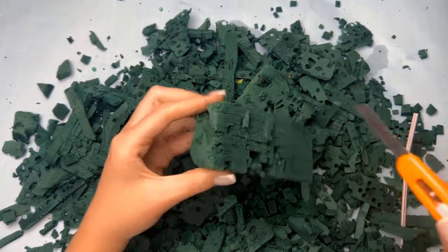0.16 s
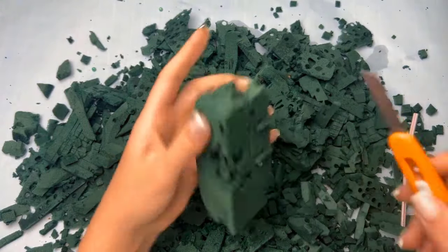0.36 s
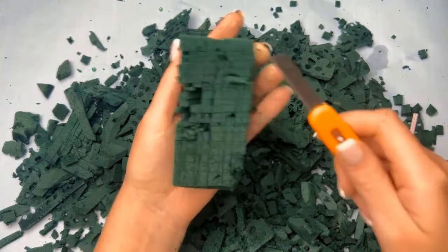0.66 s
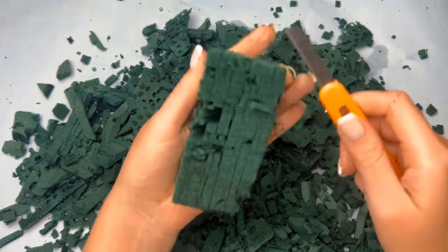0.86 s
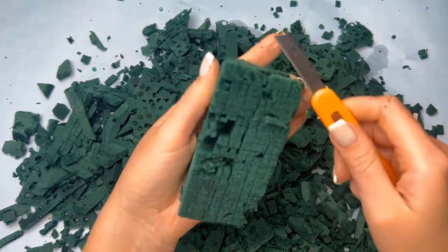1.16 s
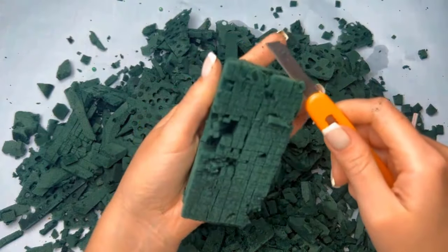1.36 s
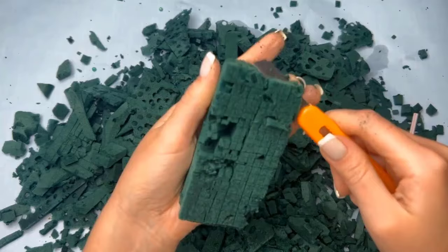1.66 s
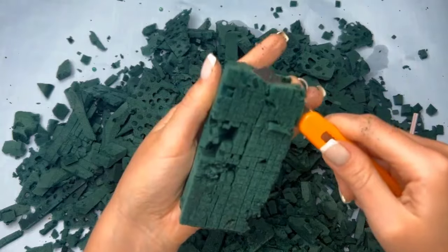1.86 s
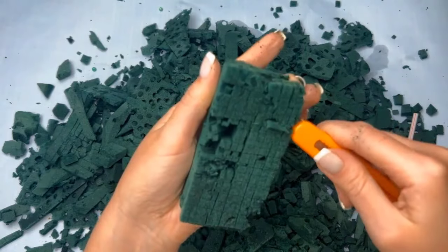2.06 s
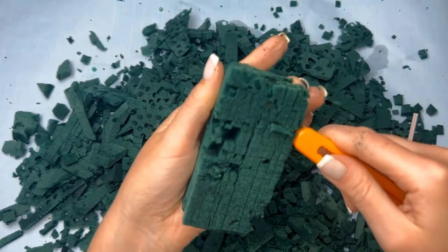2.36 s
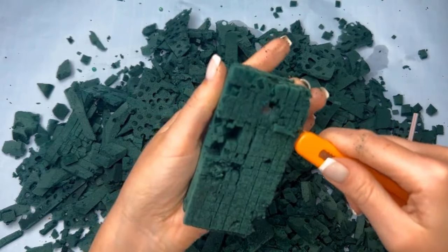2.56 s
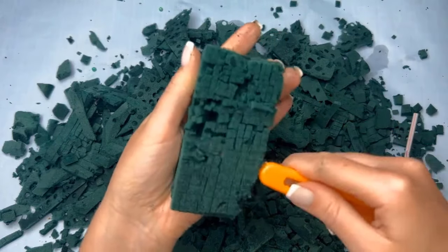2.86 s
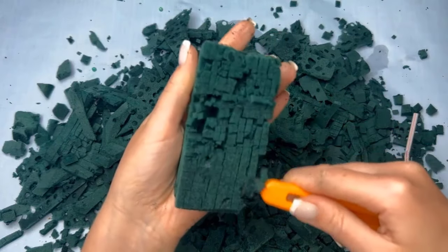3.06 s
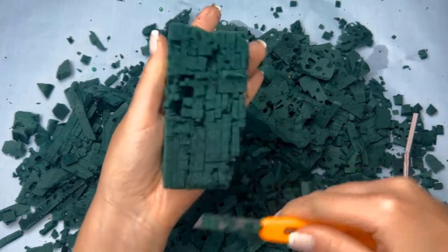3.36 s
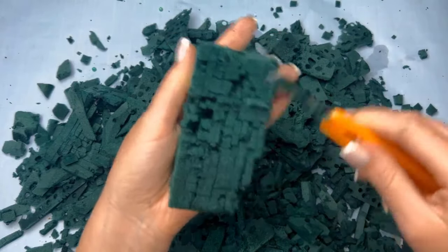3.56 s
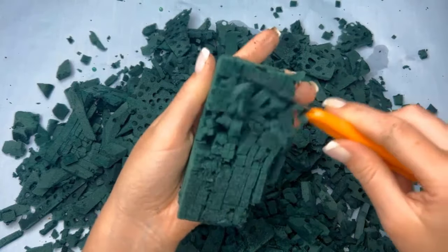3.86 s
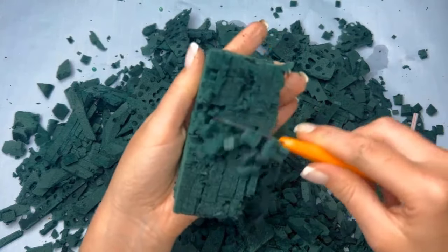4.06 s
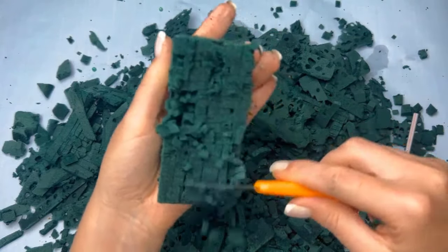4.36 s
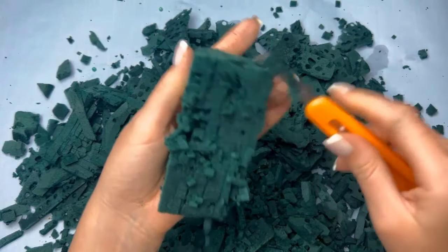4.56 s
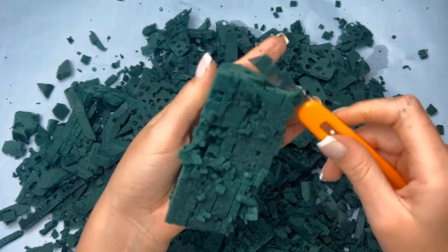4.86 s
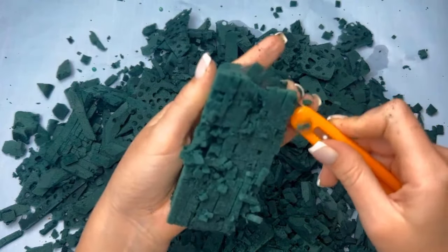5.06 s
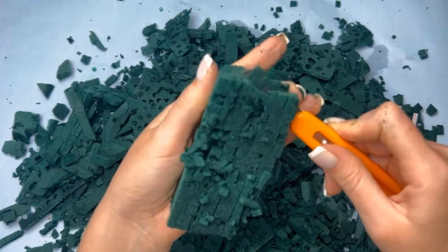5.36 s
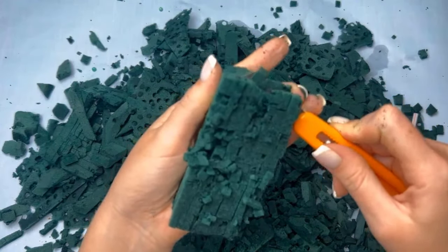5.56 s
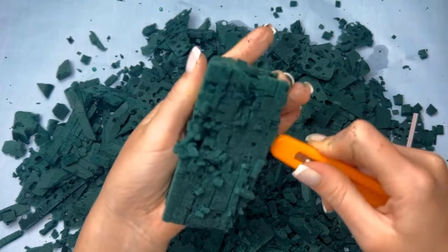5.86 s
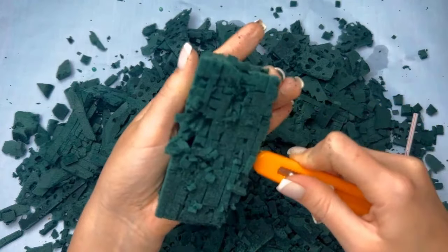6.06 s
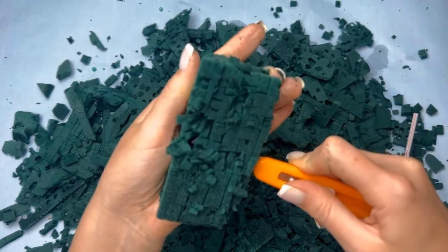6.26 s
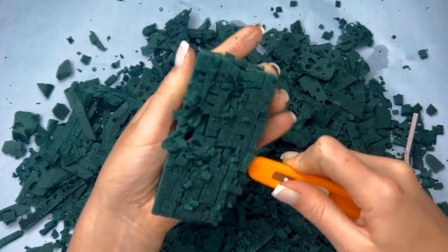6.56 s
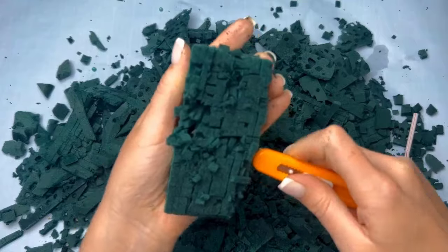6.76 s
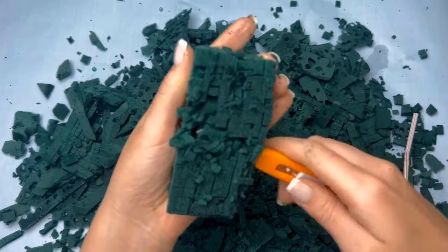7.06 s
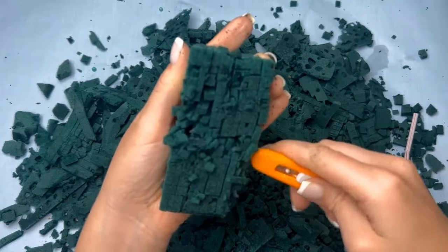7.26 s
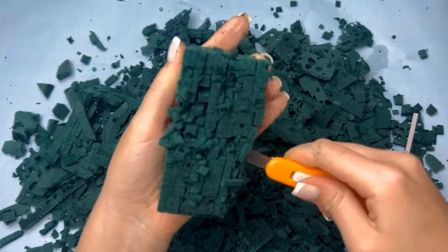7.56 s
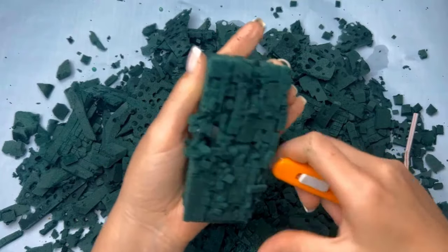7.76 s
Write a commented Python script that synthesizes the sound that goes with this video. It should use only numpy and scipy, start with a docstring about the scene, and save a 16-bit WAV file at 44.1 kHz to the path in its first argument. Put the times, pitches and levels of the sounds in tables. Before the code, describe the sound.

A craft knife scrapes through dry, crumbly foam in crunchy strokes, with small ticks, soft bumps and one loud final rasp over a fan hum.

```python
"""Craft knife through dry foam

A blade scrapes through a crumbly foam block close to two microphones. Tiny cells crush under the edge
in slow strokes, the thin steel ticks as it catches, hands bump the block. Near the end the blade tears
through in one loud, overloading rasp and squeaks out. A fan hums in the room."""
import sys
import numpy as np
from scipy import signal
from scipy.fft import rfft, irfft, next_fast_len
from scipy.io import wavfile

SR = 44100
rng = np.random.default_rng(int(sys.argv[2]) if len(sys.argv) > 2 else 0)


def to_wav(s):
    """Save 16-bit WAV."""
    ch = np.atleast_2d(s).T  # columns
    pcm = np.round(np.clip(ch, -1, 1) * 32767)  # PCM
    wavfile.write(sys.argv[1], SR, pcm.astype(np.int16))


N = 349699
TIME_S = np.arange(N) / SR
FFT_SIZE = next_fast_len(N + 4096)
FREQ_HZ = np.maximum(np.arange(FFT_SIZE // 2 + 1) * SR / FFT_SIZE, 1)

# stereo image of blade and foam: (frequency [Hz], coherence [0-1], left phase lead [rad])
NEAR_IMAGE = [(200, .95, 0), (700, .45, -.7), (1700, .65, 0), (2700, .5, 2.5), (4000, .4, 1),
              (5200, .5, 1.7), (5600, .996, 3.1), (6400, .996, 3.2), (6950, .5, 4.8), (7600, .88, 6.1),
              (8900, .8, 6.5), (9800, .99, 9.35), (10900, .99, 9.5), (11600, .6, 12)]
# stereo image of fan air and knocks: (frequency [Hz], coherence [0-1], left phase lead [rad])
FAR_IMAGE = [(60, 0.97, 0.007), (133, 1, 0.02), (246, 0.92, 0.0092), (660, 0.014, 0), (1600, 0.79, 0.042),
             (3140, 0.91, 0.008), (7000, 0.06, 0.007)]
# fan air: (frequency [Hz], relative density [dB])
AIR_SPECTRUM = [(20, -23), (48, -5.5), (75, -5), (120, -5), (220, 0), (330, -6), (430, -10.5), (520, -8),
                (750, -12.5), (1300, -18), (1800, -25), (2700, -42.5), (5000, -95)]
# fan hum: (frequency [Hz], relative level [dB])
FAN_TONES = [(156.1, -58.5), (199.2, -39.5), (333.8, -40.5)]
# handling bumps: (time [s], level [dB], pitch [Hz], half rise time [s])
HAND_THUDS = [(0.771, -10.5, 65.6, 0.0083), (0.804, -23, 60, 0.009), (0.958, -18, 85.5, 0.0054),
              (1.91, -26, 48, 0.02), (2.458, -26, 47.4, 0.031), (7.39, -22.5, 64, 0.027)]
# knife and fingers hit the block: (time [s], level [dB], resonance [Hz], grit t60 [s])
BLOCK_KNOCKS = [(0.401, -21.5, 498, 0.057), (0.9311, -14, 469, 0.19), (.942, -36, 2000, 0.9),
                (0.959, -17.5, 306, 0.4), (.963, -27, 2140, 0.063), (2.528, -12.5, 1470, 0.12),
                (2.533, -20.5, 397, 0.26), (7.405, -23, 1500, 0.18), (7.681, -13.5, 1820, 0.023)]
# struck blade: (frequency [Hz], level [dB], t60 [s])
BLADE_MODES = [(1750, -16, .008), (2230, -2, .015), (2790, -10, .008), (3340, -12, .012), (4600, -11, .005),
               (5550, -1, .006), (7000, -2, .006), (8950, -3, .006), (11000, -2, .006)]
# blade catches, springs free; rows at 0.403 s and 2.53 s are the bright crack of block knocks: (time [s],
# strength [dB], brightest pitch [Hz], spread [octaves])
BLADE_CATCHES = [(.403, -10.5, 3240, 0.38), (2.53, -13, 2810, .8), (3.279, -6, 3350, .3),
                 (3.2873, -7, 3800, 0.43), (3.294, 7, 8600, 1), (3.3023, -1.5, 9800, 0.88),
                 (5.458, 6.5, 4740, 1.7), (6.671, -7.5, 3300, 0.3), (6.856, -7, 3300, 0.24),
                 (7.361, -12, 3770, 0.3), (7.6828, 5, 5140, 0.51), (7.7091, 8.5, 3500, 0.36),
                 (7.854, -12, 3400, 0.24)]
# rubbed blade: (frequency [Hz], width [Hz], relative level [dB])
RUBBED_MODES = [(2060, 2700, -12.5), (3380, 810, -21.5), (4850, 380, -16), (6030, 1100, -64),
                (7175, 67, -19.5), (8000, 1600, -10.5)]
# slowly crushed foam: (frequency [Hz], relative density [dB])
CRUSH_SPECTRUM = [(150, -22), (400, -9), (900, -9.5), (1500, -8), (2700, -8), (4000, -7.5), (5300, -4),
                  (7250, -1.5), (8900, -4), (10500, -1), (11600, -5.5)]
# fingers and blade flat rub the block: (time [s], level [dB])
RUB_CURVE = [(0, -52), (.2, -42.5), (.78, -46), (.88, -52), (1.35, -52.5), (2.95, -41.5), (3.6, -56.5),
             (3.85, -58), (4.25, -49), (4.45, -51), (5.12, -56.5), (5.25, -47), (5.4, -48.5), (6.95, -46.5),
             (7.05, -48), (7.93, -40)]
# edge strokes: (start [s], length [s], level [dB], dull band gain [dB])
EDGE_STROKES = [(0.313, 0.12, -36.5, 6), (0.913, 0.05, -44.5, 17.5), (1.38, 0.29, -36, 1.5),
                (1.55, 0.078, -36.5, 0.5), (1.677, 0.06, -29.5, 0.5), (1.763, 0.13, -33, -1.5),
                (1.955, 0.037, -29.5, -4), (1.984, 0.027, -24, 3.5), (2.07, 0.12, -35, 0.5),
                (2.226, 0.11, -28.5, -1.5), (2.352, 0.12, -32.5, 0), (2.485, 0.11, -30.5, 7),
                (2.589, 0.16, -23, -1), (2.716, 0.1, -18.5, 2), (2.968, 0.11, -24, 2),
                (3.076, 0.13, -21, 1), (3.226, 0.056, -24, 5), (3.97, 0.076, -35.5, 1),
                (4.22, 0.13, -45, -9), (4.863, 0.054, -48.5, 3), (5.012, 0.036, -41, 0.5),
                (5.458, 0.081, -34.5, 10), (5.546, 0.11, -38.5, 8), (5.649, 0.1, -18, 2),
                (5.875, 0.081, -24, -3), (5.935, 0.078, -19, 1), (6.023, 0.18, -29.5, 0),
                (6.215, 0.15, -30.5, 3), (6.297, 0.21, -32.5, 3.5), (6.573, 0.15, -31.5, 2),
                (6.736, 0.18, -36, 2), (7.167, 0.042, -39.5, 9.5)]
# torn foam: (frequency [Hz], relative density [dB])
TEAR_SPECTRUM = [(25, -14), (60, -5), (200, -10), (600, -14), (1050, -26), (1600, -13), (3300, -5),
                 (4000, -6), (6000, 0), (8000, -1), (10500, -2), (11800, -5)]
# chunks give way in the rip: (time [s], surge [dB], length [s])
CHUNK_SURGES = [(7.368, 19, 0.0057), (7.385, 25, 0.0074), (7.396, 15.5, 0.028), (7.418, 36, 0.012),
                (7.433, 8.5, 0.015), (7.474, 10, 0.015), (7.514, 13.5, 0.0084)]
# bent blade: (frequency [Hz], peak gain [dB])
BENT_MODES = [(3470, -2.5), (4170, 0), (5090, 0), (6050, 4.5), (7240, -7), (7950, -11), (9780, -8)]
# steel leaves the block: (time [s], level [dB])
SQUEAK_CURVE = [(7.68, -86), (7.77, -32), (7.848, -44), (7.855, -30), (7.9, -36), (7.915, -67)]

SWELL_SHARE = 0.6   # attack / stroke length
RIP_START_S, RIP_HOLD_S = 7.368, 0.17


def from_db(db):
    """Decibels to gain."""
    return 10 ** (np.asarray(db) / 20)


def unit_rms(x):
    """Scale to rms 1."""
    return x / np.sqrt(np.mean(x ** 2) + 1e-20)


def gain_curve(rows):
    """Level breakpoints to gain per sample."""
    times_s, levels_db = np.transpose(rows)
    return from_db(np.interp(TIME_S, times_s, levels_db))


def per_bin(rows):
    """Table columns interpolated over log frequency."""
    hz, *columns = np.transpose(rows)
    return [np.interp(np.log(FREQ_HZ), np.log(hz), column) for column in columns]


def drift(rate_hz):
    """Smooth random curve, rms 1."""
    spectrum = rfft(rng.standard_normal(FFT_SIZE)) / (1 + (FREQ_HZ / rate_hz) ** 2)
    return unit_rms(irfft(spectrum, FFT_SIZE)[:N])


def butter(x, order, edges_hz, kind="low"):
    """Causal Butterworth filter."""
    return signal.sosfilt(signal.butter(order, edges_hz, kind, fs=SR, output="sos"), x)


def resonance(x, hz, width_hz):
    """Two-pole resonator, peak gain 1."""
    radius = np.exp(-np.pi * width_hz / SR)
    feedback = [1, -2 * radius * np.cos(2 * np.pi * hz / SR), radius ** 2]
    return signal.lfilter(np.array([1, 0, -1]) * (1 - radius ** 2) / 2, feedback, x)


def envelope(start_s, attack_s, length_s, fall_db_per_s):
    """Rise, hold, decay; one gain per millisecond."""
    age_s = np.arange(0, N / SR + .001, .001) - start_s
    return np.clip(age_s / attack_s, 0, 1) * from_db(-fall_db_per_s * np.maximum(age_s - length_s, 0))


def per_sample(per_ms):
    """Millisecond grid to sample grid."""
    return np.interp(TIME_S, np.arange(len(per_ms)) / 1000, per_ms)


def microphones(pair, image, spectrum=None):
    """Two independent signals to partly coherent, phase-shifted stereo."""
    coherence, lead_rad = per_bin(image)
    colour = 1 if spectrum is None else from_db(per_bin(spectrum)[0])
    left, other = rfft(pair, FFT_SIZE) * colour
    right = coherence * left * np.exp(-1j * lead_rad) + np.sqrt(1 - coherence ** 2) * other
    return irfft(np.array([left, right]), FFT_SIZE)[:, :N]


def fan():
    """Dull rushing air and wavering tones, slightly left."""
    air = unit_rms(microphones(rng.standard_normal((2, N)), FAR_IMAGE, AIR_SPECTRUM))
    hum = np.zeros(N)
    for hz, db in FAN_TONES:
        gain = from_db(db + 3.0 * drift(rate_hz=6))
        hum += gain * np.sin(2 * np.pi * hz * TIME_S + 0.88 * drift(rate_hz=4.5))
    return (from_db(-32.5) * air + from_db(-0.5) * hum) * from_db([[.4], [-.4]])


def hand_thuds():
    """Soft bumps swell and die within a few low cycles."""
    thuds = np.zeros(N)
    for start_s, db, hz, swell_s in HAND_THUDS:
        age_s = np.clip(TIME_S - start_s, 0, .5)
        rise = age_s / (2 * swell_s)
        gain = from_db(db) * (rise * np.exp(1 - rise)) ** 4
        thuds += gain * np.sin(2 * np.pi * hz * (age_s - swell_s / 2))
    return thuds


def block_knocks(t60_cycles=25.4, attack_s=0.001):
    """The damped block answers a bump with one hollow resonance and a gritty decay."""
    knocks = np.zeros((2, N))
    for start_s, db, hz, t60_s in BLOCK_KNOCKS:
        age_s = np.maximum(TIME_S - start_s, 0)
        noise = butter(rng.standard_normal((2, N)), 1, [hz / 2.3, hz * 1.08], "band")
        grit = unit_rms(noise) * from_db(-60 * np.minimum(age_s / t60_s, 2))
        hollow = np.sin(2 * np.pi * hz * age_s) * from_db(-60 * np.minimum(age_s * hz / t60_cycles, 2))
        knocks += from_db(db) * (1 - np.exp(-age_s / attack_s)) * (0.7 * grit + hollow)
    return microphones(butter(knocks, 4, 2900), FAR_IMAGE)


def blade_ticks(catches, attack_s=0.00034, crack_t60_s=0.0047, rattle_t60_s=0.22):
    """Each catch cracks and strikes the blade modes near its brightest pitch; a faint rattle follows."""
    ticks = np.zeros((2, N))
    age_s = np.arange(SR // 10) / SR
    attack = 1 - np.exp(-age_s / attack_s)
    hz, mode_db, t60_s = np.transpose(BLADE_MODES)[:, :, None]
    for start_s, db, bright_hz, spread_oct in catches:
        weights = from_db(mode_db) * np.exp(-.5 * (np.log2(hz / bright_hz) / spread_oct) ** 2)
        phases_rad = rng.uniform(0, 2 * np.pi, (2, len(BLADE_MODES), 1))
        modes = weights * from_db(-60 * age_s / t60_s) * np.sin(2 * np.pi * hz * age_s + phases_rad)
        top_hz = min(1.58 * bright_hz, 14000)
        grit = butter(rng.standard_normal((2, len(age_s))), 3, [1500, top_hz], "band")
        crack = spread_oct * from_db(1.0 - 60 * age_s / crack_t60_s) * grit
        rattle = from_db(-23.5 - 60 * age_s / rattle_t60_s) * grit
        tick = from_db(db) * attack * (modes.sum(axis=1) + crack + rattle)
        onset = int(start_s * SR)
        ticks[:, onset:onset + len(age_s)] += tick[:, :N - onset]
    return microphones(ticks, NEAR_IMAGE)


def palm_echo(x, delay_s=.00087, wander=.07, gain=.33):
    """The palm reflects the scrape over a changing path: shifting hollow colour, rms 1."""
    delayed_s = TIME_S - delay_s * (1 + wander * drift(rate_hz=1.7))
    echo = np.array([np.interp(delayed_s, TIME_S, side) for side in x])
    return unit_rms(x + gain * echo)


def crushing(spectrum, snaps_per_s, size_spread_db, dust_gain, steel_db):
    """Cell walls snap over dust hiss; blade resonances swell and fade as the contact shifts."""
    snaps = (rng.random((2, N)) < snaps_per_s / SR) * rng.choice([-1, 1], (2, N))
    sizes = from_db(size_spread_db * np.minimum(rng.exponential(1, (2, N)), 5))
    grains = unit_rms(snaps * sizes) + dust_gain * rng.standard_normal((2, N))
    foam = unit_rms(microphones(grains, NEAR_IMAGE, spectrum))
    steel = np.zeros((2, N))
    for hz, width_hz, db in RUBBED_MODES:
        gain = from_db(db + steel_db + 3.34 * drift(rate_hz=37))
        steel += gain * unit_rms(resonance(foam, hz, width_hz))
    return unit_rms(foam + steel)


def stroke_gain(start_s, length_s, tail_share=0.34):
    """The edge digs in, holds, lifts off; a short, fainter tail fades after it."""
    attack_s = SWELL_SHARE * length_s
    edge = envelope(start_s, attack_s, length_s, fall_db_per_s=430)
    tail = envelope(start_s, attack_s, length_s, fall_db_per_s=87)
    return (1 - tail_share) * edge + tail_share * tail


def slow_strokes(rip_tail_db=-14.5, rip_tail_dull_db=-7, rub_dull_db=4, split_hz=5600):
    """Strokes, rubbing and the rip's tail, each with its own dull gain; light contact is mostly duller."""
    contacts = [(from_db(db) * stroke_gain(start_s, length_s), dull_db)
                for start_s, length_s, db, dull_db in EDGE_STROKES]
    rip_tail = envelope(RIP_START_S, SWELL_SHARE * RIP_HOLD_S, RIP_HOLD_S, fall_db_per_s=67)
    contacts.append((from_db(rip_tail_db) * rip_tail, rip_tail_dull_db))
    hiss_power = per_sample(sum(gain ** 2 for gain, _ in contacts))
    dull_power = per_sample(sum((gain * from_db(dull_db)) ** 2 for gain, dull_db in contacts))
    rub = gain_curve(RUB_CURVE)
    hiss_gain = np.sqrt(hiss_power + rub ** 2)
    dull_gain = np.sqrt(dull_power + (rub * from_db(rub_dull_db)) ** 2)
    grains = crushing(CRUSH_SPECTRUM, snaps_per_s=7000, size_spread_db=2.5, dust_gain=1, steel_db=4.5)
    scrape = palm_echo(grains)
    dull = signal.sosfiltfilt(signal.butter(3, split_hz, fs=SR, output="sos"), scrape)
    hardness_db = 1.16 * drift(rate_hz=19)   # uneven foam
    return from_db(hardness_db) * (hiss_gain * (scrape - dull) + dull_gain * dull)


def rip(bend_s=0.13, squeak_hz=3410, squeak_width_hz=520):
    """Fast cut: crushing surges as chunks give way; the bent blade rings, straightens, squeaks out."""
    level_db = -7.5 + 1.5 * drift(rate_hz=160)
    for start_s, surge_db, length_s in CHUNK_SURGES:
        age_s = TIME_S - start_s
        level_db += surge_db * (age_s >= 0) * np.maximum(1 - (age_s / length_s) ** 2, 0)
    bite = per_sample(envelope(RIP_START_S, attack_s=0.0011, length_s=RIP_HOLD_S, fall_db_per_s=174))
    grains = crushing(TEAR_SPECTRUM, snaps_per_s=11000, size_spread_db=3, dust_gain=.37, steel_db=-17.5)
    tearing = bite * from_db(level_db) * palm_echo(grains)
    ringing = sum(from_db(db) * resonance(tearing, hz, width_hz=110) for hz, db in BENT_MODES)
    bend = np.exp(-(np.maximum(TIME_S - RIP_START_S, 0) / bend_s) ** 2)
    band = resonance(grains, squeak_hz, squeak_width_hz)
    squeak = gain_curve(SQUEAK_CURVE) * unit_rms(resonance(band, squeak_hz, squeak_width_hz))
    # each chunk plucks the blade; columns as in BLADE_CATCHES
    plucks = blade_ticks([(start_s, -2, 3400, .8) for start_s, _, _ in CHUNK_SURGES])
    return (1 - bend / 2) * tearing + bend * ringing + plucks + squeak


def scene(top_hz=11700):
    """Knife and fan, low-passed, plus handling."""
    knife_and_fan = slow_strokes() + blade_ticks(BLADE_CATCHES) + rip() + fan()
    lowpass = signal.ellip(10, .2, 70, top_hz, fs=SR, output="sos")
    return signal.sosfilt(lowpass, knife_and_fan) + block_knocks() + hand_thuds()


def record(dry, ceiling_db=-3.7, hardness=11, cutoff_hz=15700):
    """The rip and the hardest ticks overload and crackle; low-pass follows."""
    clipped = dry / (1 + np.abs(dry / from_db(ceiling_db)) ** hardness) ** (1 / hardness)
    return signal.sosfilt(signal.ellip(10, .2, 80, cutoff_hz, fs=SR, output="sos"), clipped)


dry = scene()
out = record(dry)
to_wav(out)
```